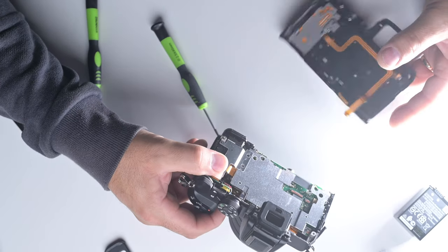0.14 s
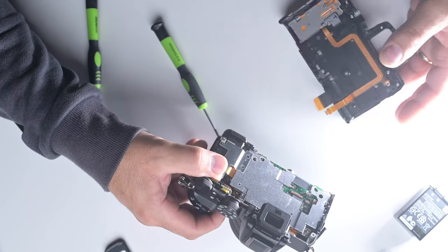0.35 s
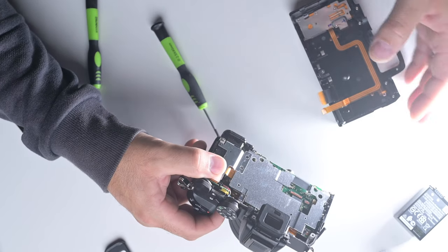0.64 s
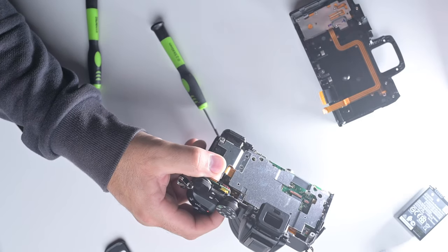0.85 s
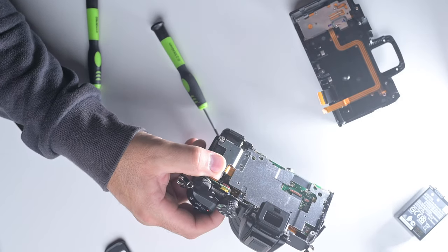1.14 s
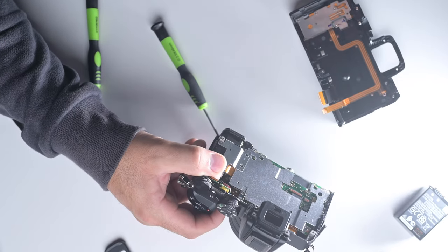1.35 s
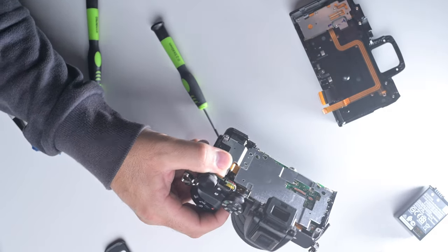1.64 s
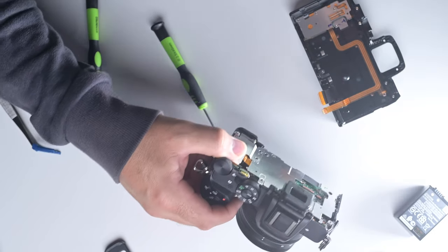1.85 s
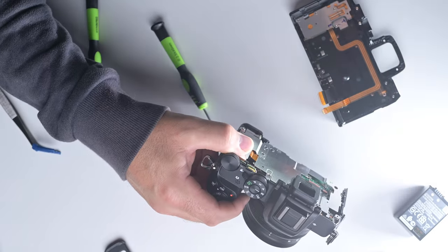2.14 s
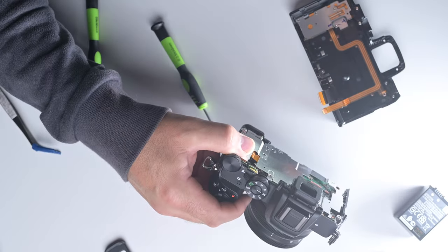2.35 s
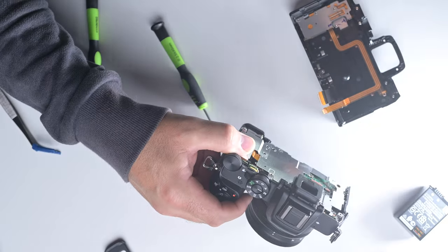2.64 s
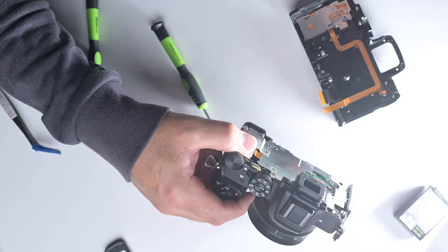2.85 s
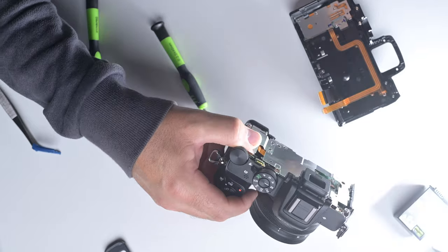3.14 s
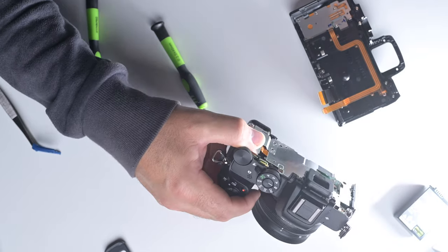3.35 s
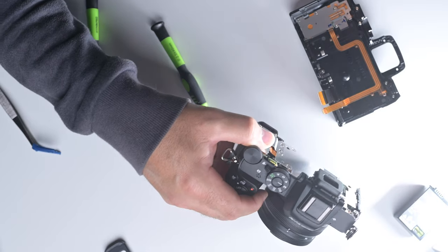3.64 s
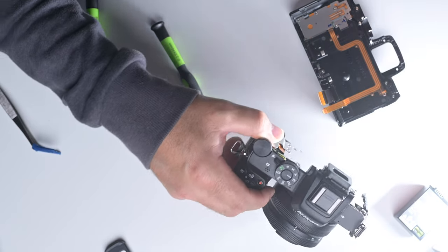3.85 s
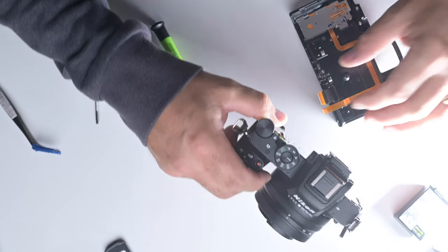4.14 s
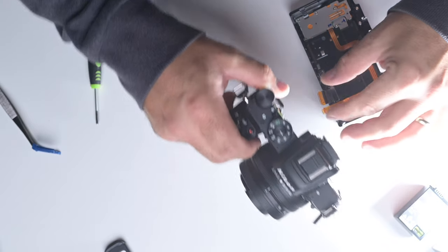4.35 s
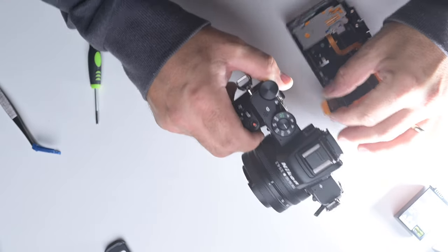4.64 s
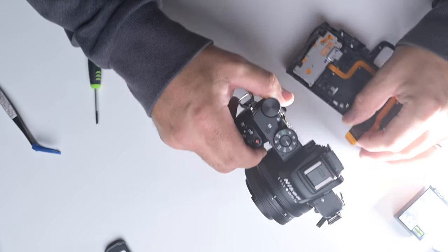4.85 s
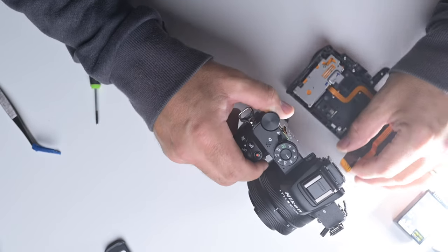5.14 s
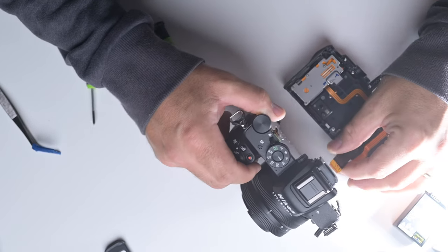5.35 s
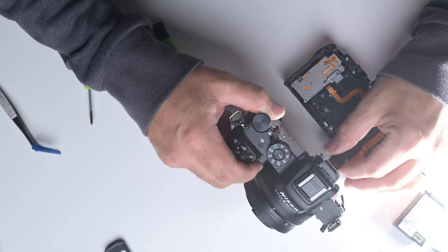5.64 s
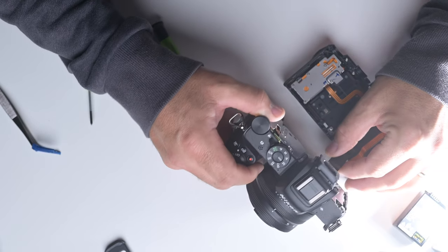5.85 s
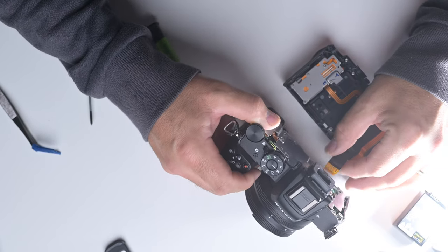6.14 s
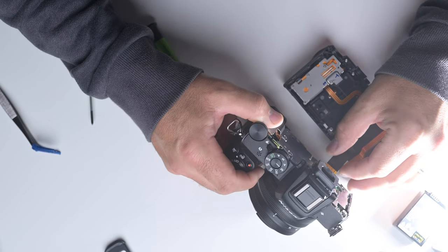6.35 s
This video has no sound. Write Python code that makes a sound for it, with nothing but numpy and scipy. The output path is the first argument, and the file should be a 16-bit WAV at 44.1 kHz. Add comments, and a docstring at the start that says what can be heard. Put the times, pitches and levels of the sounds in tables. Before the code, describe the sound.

A plastic panel is laid on a wooden table with a light clatter. A camera body is then dragged, nudged and tipped, rasping on the wood with small knocks, before dropping with a loud, hollow thump. A sleeve brushes faintly, the panel scrapes closer, and small parts tick under the fingers. The handling sounds close, in a small, quiet room.

```python
"""Hands work on a camera body at a light wooden table in a small, quiet room. First the back panel is
laid down with a clatter. The body is dragged, nudged, rocked and tipped, rasping as it rubs the wood,
then drops just after 3 s: the table top booms and rings, and the plastic shell cracks against it.
A sleeve brushes by and the panel is slid closer. Last, small parts tick under the fingers."""
import sys
import numpy as np
from scipy import signal
from scipy.fft import rfft, irfft, next_fast_len
from scipy.io import wavfile
from scipy.ndimage import uniform_filter1d, map_coordinates

SR = 44100
rng = np.random.default_rng(int(sys.argv[2]) if len(sys.argv) > 2 else 0)


def unload_wav(signal):
    """Save mono or channel-first audio to the path in sys.argv[1] as 16-bit WAV at rate SR, clipped to [-1, 1]."""
    wavfile.write(
        sys.argv[1],
        SR,
        np.round(np.clip(np.atleast_2d(signal).T, -1, 1) * 32767).astype(np.int16),
    )


N = 287091

BOOM_HZ = 113  # the whole table top flexes at this pitch
# Tone colour of rubbing on the table: (frequency [Hz], level [dB])
RUB_COLOUR = [(80, -47.5), (200, -1), (400, 1.5), (1000, -5), (2000, -12), (3000, -17), (5000, -24.5),
              (9000, -37.5), (16000, -59)]
# Tone colour of a sharp snap: (frequency [Hz], level [dB])
SNAP_COLOUR = [(300, -27), (1500, -9.5), (4000, -3), (6000, -5.5), (9000, -9), (12500, -12.5), (16000, -17)]
# Resonances (favoured pitches) of a part lying flat: (pitch [Hz], width [Hz], strength [dB])
FLAT_PEAKS = [(480, 250, 6.5), (650, 100, 3), (1200, 190, -2), (3000, 370, 5), (4350, 300, 14.5),
              (5110, 270, 9), (7020, 980, 7), (8800, 1100, 16), (10800, 800, 2.5), (11570, 1100, 13.5)]


def amp(db):
    """Turn decibels into a multiplier."""
    return 10 ** (np.asarray(db) / 20)


def unit(x):
    """Scale a signal to an average (rms) strength of 1."""
    return x / np.sqrt(np.mean(x ** 2) + 1e-20)


def along(points, hz):
    """Read between (frequency, value) points on a log frequency scale."""
    f, values = np.transpose(points)
    return np.interp(np.log(hz + 1), np.log(f + 1), values)


def humps(peaks, f):
    """A gain curve with one hump for each resonance."""
    return 1 + sum(amp(db) / (1 + (2 * (f - hz) / width) ** 2) for hz, width, db in peaks)


def filtered(x, response):
    """Scale each frequency f in x by response(f)."""
    size = next_fast_len(len(x) + 8192)
    return irfft(rfft(x, size) * response(np.fft.rfftfreq(size, 1 / SR)), size)[:len(x)]


def noise(t, response):
    """Noise of strength 1, as long as t, coloured by response(f)."""
    return unit(filtered(rng.standard_normal(len(t)), response))


def ring(modes, t):
    """A struck object's tones, at slightly random levels; each fades 60 dB in its ring time, t60."""
    return sum(amp(db + 2.5 * rng.normal() - 60 * t / t60) * np.sin(2 * np.pi * (hz * t + rng.random()))
               for hz, db, t60 in modes)


def grit(count, bumps_per_s, rough_db, patchy_db=0):
    """Uneven noise, as from rubbing over bumps: rough_db varies its level, patchy_db its colour."""
    heights = rng.standard_normal(int(count * bumps_per_s / SR) + 4)
    bumps = map_coordinates(heights, [np.arange(count) * bumps_per_s / SR])
    spectrum = signal.stft(rng.standard_normal(count), nperseg=256)[2]
    patches = uniform_filter1d(rng.standard_normal(spectrum.shape), size=3, axis=0)
    patches = unit(uniform_filter1d(patches, size=20, axis=1))
    patchy = signal.istft(spectrum * amp(patchy_db * patches), nperseg=256)[1][:count]
    return amp(rough_db * bumps) * patchy


def hush():
    """The faint, steady noise of room and microphone."""
    # Its tone colour: (frequency [Hz], level [dB])
    colour = [(15, -58), (25, -20), (113, -7.5), (174, -6.5), (234, -4.5), (369, -9), (539, -15.5),
              (633, -10.5), (785, -16.5), (1420, -22.5), (1810, -27), (9610, -31), (15600, -41.5)]
    air = grit(N, bumps_per_s=0.9, rough_db=0.48)
    return amp(-66.5) * unit(filtered(air, lambda f: amp(along(colour, f))))


def room_echo(x):
    """The walls answer, each frequency fading at its own speed; a new tail every third of a second."""
    # How long the room rings: (frequency [Hz], ring time [s])
    ring_times = [(100, 0.25), (500, 0.22), (3000, 0.17), (12000, 0.19)]
    out, step, delay = np.zeros(N + SR), SR // 3, 200  # in samples
    for start in range(0, N, step):
        hz, t, spectrum = signal.stft(rng.standard_normal(SR // 2), SR, nperseg=256)
        decay = amp(-60 * t / along(ring_times, hz)[:, None])
        tail = signal.istft(spectrum * decay, SR, nperseg=256)[1]
        echo = signal.fftconvolve(x[start:start + step], tail / np.linalg.norm(tail))
        out[start + delay:][:len(echo)] += echo[:N + SR - start - delay]
    return out[:N]


def rub(moves, peaks, rough_db, hiss_db, boom_db, hiss_growth=1.27, fade_s=0.02):
    """One drag shakes table, part and air: weight brings rumble and boom, speed brings rasp and hiss."""
    times, rumble_db, rasp_db = np.transpose(moves)
    usual_db = -40  # boom and hiss swing further around this level than rumble and rasp do
    boom_level = usual_db + boom_db + 1.3 * (rumble_db - usual_db)
    hiss_level = usual_db + hiss_db + hiss_growth * (rasp_db - usual_db)
    start = round(times[0] * SR)
    t = np.arange(start, min(N, round(times[-1] * SR))) / SR
    force = grit(len(t), bumps_per_s=160, rough_db=rough_db, patchy_db=1.5)
    slow_force = grit(len(t), bumps_per_s=45, rough_db=2.2)
    colour = lambda f: amp(along(RUB_COLOUR, f)) * humps(peaks, f)
    low = lambda f: 1 / (1 + (f / 700) ** 4)
    high = lambda f: 1 - 1 / (1 + (f / 3000) ** 4)
    boom = filtered(force, lambda f: 1 / (1 + ((f - BOOM_HZ) / 9) ** 2))
    rumble = filtered(slow_force, lambda f: colour(f) * low(f))
    rasp = filtered(force, lambda f: colour(f) * (1 - low(f)) * (1 - high(f)))
    hiss = filtered(force, lambda f: colour(f) * high(f))
    layers = [(boom_level, boom), (rumble_db, rumble), (rasp_db, rasp), (hiss_level, hiss)]
    fade = np.clip(np.minimum(t - times[0], times[-1] - t) / fade_s, 0, 1)
    out = np.zeros(N)
    out[start:][:len(t)] = fade * sum(amp(np.interp(t, times, db)) * unit(x) for db, x in layers)
    return out


def sleeve():
    """Cloth brushes by: soft rubbing with no resonances of its own."""
    # The brush: (time [s], rumble [dB], rasp [dB])
    brush = [(3.7, -73, -80.5), (3.838, -74, -78.5), (3.988, -74.5, -76), (4.39, -80.5, -84.5),
             (4.62, -74, -76)]
    return rub(brush, [], rough_db=2.0, hiss_db=6, boom_db=-20)


def fingers():
    """Fingers rub faintly on the camera near the end."""
    # Their touch: (time [s], rumble [dB], rasp [dB])
    touch = [(5.7, -69.5, -72), (5.926, -68, -73), (6.086, -70.5, -72), (6.426, -72.5, -74.5),
             (6.5, -72.5, -78)]
    return rub(touch, FLAT_PEAKS, rough_db=4.5, hiss_db=-5, boom_db=1)


def ticks():
    """Small parts snap and creak: a short, rough ring of the part and a click through the frame."""
    # Each tick: (time [s], relative ring level [dB], pitch [Hz], click level [dB])
    snaps = [(2.0356, -50, 1400, -50), (2.152, -40, 1420, -54), (2.171, -20.5, 1390, -41.5),
             (2.4911, -47, 1380, -50.5), (3.3899, -53, 1374, -79.5), (3.6848, -51.5, 4170, -76),
             (4.2631, -56.5, 1167, -56), (4.3047, -51.5, 2830, -53), (4.3339, -56, 2303, -65.5),
             (4.7204, -43, 2330, -39), (5.2998, -45, 1950, -50), (5.3806, -51, 1990, -61),
             (5.445, -46, 1510, -51.5), (5.5453, -48, 1340, -49), (5.6192, -49, 1794, -55),
             (5.6425, -52.5, 1420, -52), (5.833, -47.5, 2070, -56.5), (5.86, -47, 1770, -55),
             (5.882, -49, 2050, -51), (5.9604, -40.5, 1310, -69), (5.9793, -39, 1334, -58),
             (5.9906, -38.5, 1360, -58), (6.0028, -41.5, 1370, -61), (6.0148, -46, 1220, -56),
             (6.043, -54.5, 1800, -57), (6.086, -41.5, 1300, -82), (6.1722, -47.5, 2060, -58),
             (6.185, -46, 1790, -49.5), (6.2054, -47, 1800, -49.5), (6.2368, -46.5, 1910, -42),
             (6.249, -46.5, 1790, -56.5), (6.2657, -45, 1800, -55.5), (6.3262, -46.5, 2076, -54),
             (6.436, -54.5, 1990, -58)]
    # Resonances of the metal frame: (pitch [Hz], width [Hz], strength [dB])
    frame_peaks = [(1960, 570, 3), (3126, 170, 2), (4428, 87, 10)]
    frame_from_s = 5.8  # later ticks come from the frame itself and make it ring
    click_colour = lambda f: amp(along(SNAP_COLOUR, f)) * humps(frame_peaks, f) / (1 + (f / 11000) ** 4)
    out, t = np.zeros(N + SR), np.arange(SR // 10) / SR
    rise = 1 - np.exp(-t / 0.00129)
    for at_s, ring_db, hz, click_db in snaps:
        creak = noise(t, lambda f: 1 / (1 + ((f - hz) / 260) ** 2))
        tone = 0.17 * np.sin(2 * np.pi * hz * t) + 0.51 * creak
        part = amp(ring_db - 60 * t / 0.027) * tone
        click = amp(-60 * t / 0.028) * noise(t, click_colour)
        frame = (at_s > frame_from_s) * ring([(4100, -10, 0.034)], t)
        out[round(at_s * SR):][:len(t)] += rise * (part + amp(click_db) * (click + frame))
    return out[:N]


def panel_scrapes():
    """The back panel rubs the wood as it is laid down, and later as it is pulled and pushed."""
    # Its moves: (time [s], rumble [dB], rasp [dB])
    set_down = [(0.06, -38, -40.5), (0.13, -43.5, -46.5), (0.218, -47, -50.5), (0.3, -27, -46)]
    lay_flat = [(0.41, -67, -67.5), (0.578, -58, -60.5), (0.655, -49.5, -60.5)]
    pull = [(4.6, -77.5, -85.5), (4.676, -48, -51.5), (4.744, -52, -49.5), (4.768, -36.5, -51.5),
            (4.786, -39, -46.5), (4.84, -54, -49), (4.87, -49, -44)]
    push = [(4.85, -41, -43.5), (4.916, -49.5, -43), (4.968, -49.5, -53.5), (5.044, -43.5, -44),
            (5.072, -44.5, -47), (5.138, -40, -43.5), (5.154, -47, -45), (5.216, -44.5, -47.5),
            (5.346, -52, -63.5), (5.376, -63, -68), (5.418, -61, -54), (5.456, -64, -67),
            (5.526, -55.5, -62), (5.7, -82, -78)]
    # Resonances of panel and table as they touch: (pitch [Hz], width [Hz], strength [dB])
    tilted_peaks = [(405, 54, 10.7), (627, 130, 23), (1040, 610, 3.2), (2050, 390, 1.7), (3670, 250, 2.2),
                    (4250, 99, 2.6), (6640, 53, 1.9)]
    sliding_peaks = [(405, 45, 22.8), (656, 270, 9.9), (793, 39, 7.8), (1130, 70, 8.4), (1920, 450, 1.4),
                     (3050, 210, 1.5), (5130, 640, 8.7), (11630, 4700, 3.1)]
    return (rub(set_down, FLAT_PEAKS, rough_db=3.5, hiss_db=-18, boom_db=-16)
            + rub(lay_flat, FLAT_PEAKS, rough_db=1.0, hiss_db=8, boom_db=-16, fade_s=0.006)
            + rub(pull, tilted_peaks, rough_db=1.0, hiss_db=0.5, boom_db=-31)
            + rub(push, sliding_peaks, rough_db=-0.1, hiss_db=-7, boom_db=-22))


def body_scrapes():
    """The camera body rubs the wood; its resonances change as it rocks and tips onto an edge."""
    # Its moves: (time [s], rumble [dB], rasp [dB])
    drag = [(1.05, -74.5, -93), (1.072, -50.5, -49.5), (1.1, -40.5, -43), (1.128, -46.5, -54.5),
            (1.162, -40.5, -39.5), (1.238, -40.5, -45), (1.3, -34.5, -38), (1.366, -44, -37.5),
            (1.424, -40, -37), (1.442, -37, -43), (1.46, -35.5, -39.5), (1.508, -42.5, -47.5),
            (1.562, -40.5, -39.5), (1.888, -36.5, -45.5), (1.902, -39, -53), (2.016, -67, -72.5),
            (2.042, -50.5, -64.5), (2.06, -62, -67)]
    nudge = [(2.07, -55, -68), (2.148, -43, -60), (2.174, -36, -38.5), (2.222, -47, -42),
             (2.248, -47.5, -54), (2.29, -43, -55), (2.316, -46, -43), (2.378, -39.5, -47.5),
             (2.386, -35, -33.5), (2.464, -41.5, -65), (2.522, -44, -57), (2.62, -53, -70)]
    rock = [(2.55, -42, -48), (2.602, -51, -56.5), (2.66, -53.5, -54.5), (2.708, -63, -45.5),
            (2.724, -48, -36), (2.75, -55, -43.5), (2.822, -79, -74), (2.83, -64, -72)]
    tip = [(2.853, -38, -34), (2.861, -27.5, -33), (2.931, -51.5, -32.5), (2.965, -50.5, -33.5),
           (3.063, -42, -42), (3.119, -48, -46.5), (3.128, -47, -44.5)]
    # Resonances of body and table as they touch: (pitch [Hz], width [Hz], strength [dB])
    drag_peaks = [(227, 92, 10.5), (354.4, 100, 16), (617, 360, 12.5), (788, 13, 21), (1227, 440, 10.5),
                  (2153, 245, 9), (3320, 2000, -0.5), (4370, 170, -5.5), (6220, 260, -6), (8650, 190, -16)]
    rock_peaks = [(543, 76, 7), (1052, 85, 21), (2310, 130, 12.3), (5270, 23, 16), (6700, 110, 3.3)]
    edge_peaks = [(215, 68, 4.7), (411.5, 44, 4), (1052, 75, 19), (1450, 210, 13), (2330, 104, 11),
                  (3126, 780, 5), (5640, 141, 3.3), (6472, 69, 12)]
    return (rub(drag, drag_peaks, rough_db=-0.46, hiss_db=-11, boom_db=-23)
            + rub(nudge, drag_peaks, rough_db=-1.0, hiss_db=-12, boom_db=-20.5)
            + rub(rock, rock_peaks, rough_db=1.5, hiss_db=-16, boom_db=-13)
            + rub(tip, edge_peaks, rough_db=1.0, hiss_db=-18.5, boom_db=-25.5,
                  hiss_growth=2.2, fade_s=0.0049))


def crack(t):
    """The snap of a hard contact: a bright burst and a duller, longer rattle."""
    # Metal plates in the parts sharpen the snap: (pitch [Hz], width [Hz], strength [dB])
    plate_peaks = [(4170, 4200, 5.5)]
    colour = lambda f: amp(along(SNAP_COLOUR, f)) * humps(plate_peaks, f)
    burst = noise(t, lambda f: colour(f) / (1 + (f / 15000) ** 2))
    rattle = noise(t, lambda f: colour(f) / (1 + (f / 5000) ** 2))
    return 2.2 * burst * amp(-60 * t / 0.011) + rattle * amp(-14 - 60 * t / 0.12)


def knocks():
    """Each blow rings the table and the shell; where and how hard it lands sets the share of each."""
    # Each blow: (time [s], boom [dB], low wood tones [dB], high wood tones [dB], shell [dB], # low pitch
    # favoured by the spot struck [Hz]); the rows at 1.72 s and 4.80 s are soft bumps as a dragged part bears
    # down
    blows = [(0.0004, -38, -1, -10.5, -8, 425), (0.0178, -49, -9, -15, -15, 362),
             (0.0329, -50, -8, -14.5, -36, 438), (0.1777, -42, -22, -24.5, -24, 690),
             (0.1855, -53, -34, -24, -26, 654), (0.249, -57, -23, -48, -30, 324),
             (0.2674, -50, -27, -48, -21.5, 340), (0.2789, -45, -23.5, -40, -38, 330),
             (0.3964, -55, -27.5, -58, -33, 353), (0.657, -38.5, -13.5, -18.5, -9, 670),
             (0.6764, -39.5, -22.5, -21, -19.5, 650), (1.2974, -41.5, -24, -32, -57, 330),
             (1.72, -42, -28, -52, -55, 330), (2.085, -54, -36, -56, -67, 186),
             (2.1887, -31, -21, -34.5, -53, 256), (2.3862, -36.5, -33, -18.5, -30, 354),
             (2.4441, -61, -32.5, -54, -61, 390), (2.4951, -60, -29, -54, -59, 336),
             (2.5178, -76, -31.5, -49, -62, 375), (2.5408, -66, -33, -42, -62, 366),
             (2.7201, -71, -39, -47, -39, 584), (2.8537, -38, -23, -31, -35, 244),
             (3.142, -25.5, 0, -2, -22, 324), (3.6691, -55, -49.5, -72, -67, 294),
             (4.7579, -59, -33.5, -55, -39, 584), (4.799, -47.5, -39, -54, -60, 400),
             (5.226, -68, -32.5, -60, -62, 304), (5.3344, -69, -40, -59, -62, 520),
             (5.4095, -72, -42, -39, -45, 296), (5.9422, -37, -33.5, -55, -48.5, 256)]
    # Tones of the table top: (pitch [Hz], level [dB], ring time when left free [s])
    wood_tones = [(187, -12.5, 0.12), (235, -11, 0.033), (320.7, -0.5, 0.098), (411.6, -8.5, 0.14),
                  (535, -8, 0.2), (650, -6, 0.16), (769.4, -5.5, 0.057), (924, 1.5, 0.029),
                  (1024, 0, 0.034), (1161, -6, 0.066), (1316, -5.5, 0.057), (1434, -9, 0.093)]
    # Tones of the plastic shell: (pitch [Hz], level [dB], ring time [s])
    shell_tones = [(1570, -5, .022), (1800, -5, .02), (2050, -6, .02), (2300, -10, .018), (2610, -10, .016),
                   (3100, -11, .014), (3390, -13, .014), (3800, -13, .012), (4300, -12, .012),
                   (4800, -14, .012)]
    ring_share = 0.65  # a knock rings for this share of the table's free ring time
    out, t = np.zeros(N + SR), np.arange(SR // 2) / SR
    rise = 1 - np.exp(-t / 0.0006)
    for at_s, boom_db, low_db, high_db, shell_db, spot_hz in blows:
        struck_tones = []
        for hz, db, t60 in wood_tones:
            strike_db = low_db - 9 * abs(np.log2(hz / spot_hz)) if hz < 700 else high_db
            struck_tones.append((hz, db + strike_db, ring_share * t60))
        boom = amp(boom_db) * ring([(BOOM_HZ, 0, 0.24)], t) * (1 - np.exp(-t / 0.006))
        wood_noise = noise(t, lambda f: amp(along(RUB_COLOUR, f)))
        clatter = amp(low_db - 12.5 - 60 * t / 0.11) * wood_noise  # the table's toneless answer
        shell = amp(shell_db) * (ring(shell_tones, t) + amp(-14) * crack(t))
        out[round(at_s * SR):][:len(t)] += boom + rise * (ring(struck_tones, t) + shell + clatter)
    return out[:N]


def scene():
    """Everything on the table, its echo and the hush, in one channel."""
    blows, snaps = knocks(), ticks()
    rubs = panel_scrapes() + fingers() + body_scrapes() + sleeve()
    echo = room_echo(amp(-9.5) * blows + amp(-8.5) * snaps + amp(-14.0) * rubs)
    return (blows + snaps + rubs + echo + hush())[None]


def record(dry):
    """The deep bass is lost, loud peaks are rounded off, and the sound has no treble above 15.8 kHz."""
    low_hz, top_hz = 69.4, 15800
    heard = signal.sosfilt(signal.butter(3, low_hz, "highpass", fs=SR, output="sos"), dry[0])
    clipped = heard / (1 + np.abs(heard) ** 8) ** (1 / 8)
    return filtered(clipped, lambda hz: hz < top_hz)[None]


dry = scene()
out = record(dry)
unload_wav(out)
```